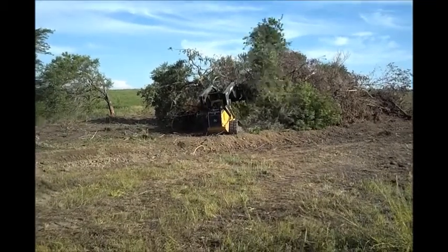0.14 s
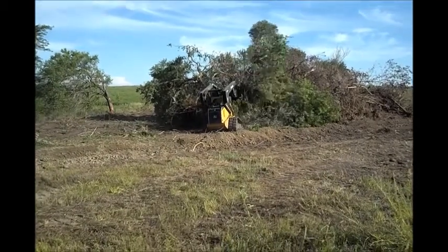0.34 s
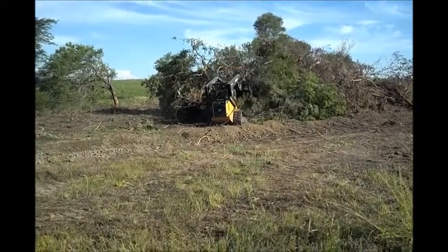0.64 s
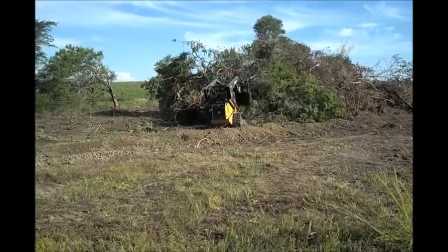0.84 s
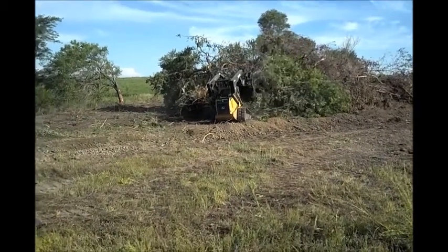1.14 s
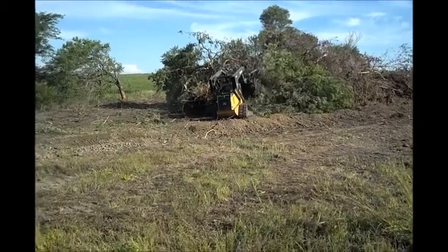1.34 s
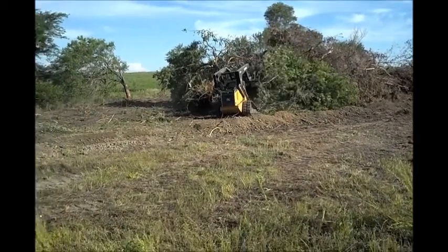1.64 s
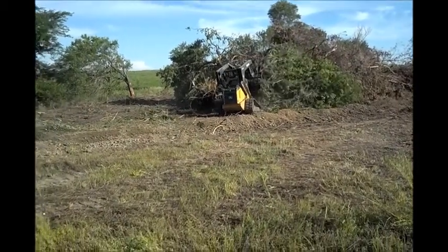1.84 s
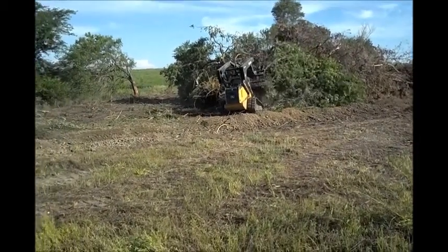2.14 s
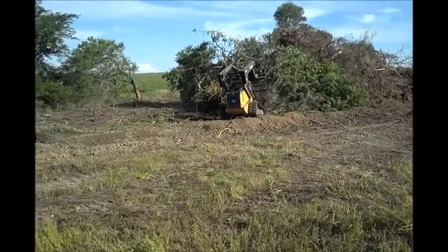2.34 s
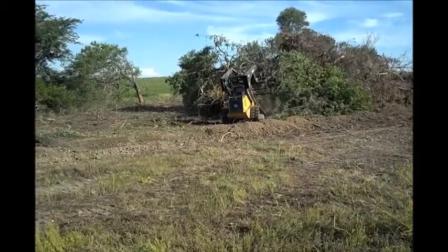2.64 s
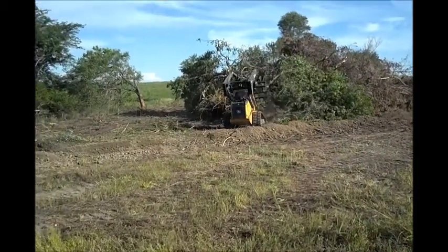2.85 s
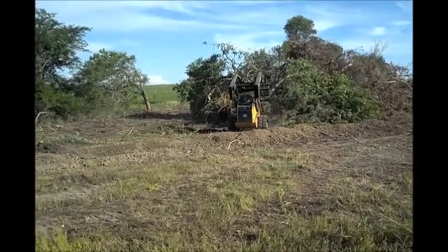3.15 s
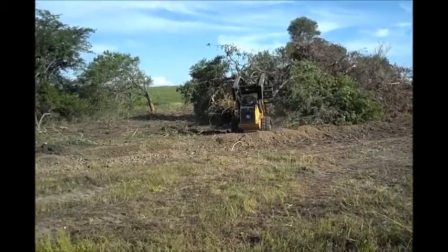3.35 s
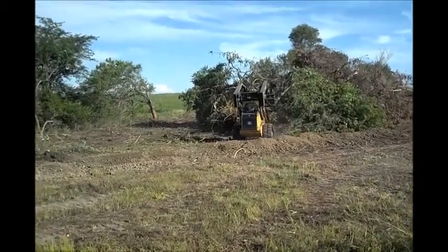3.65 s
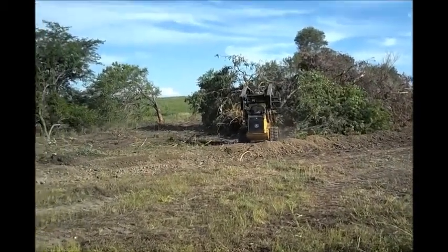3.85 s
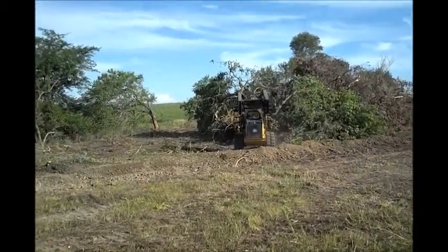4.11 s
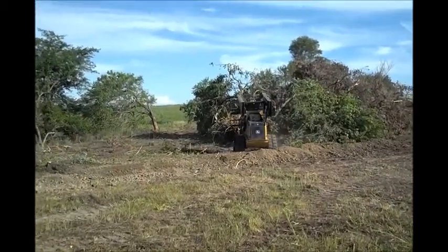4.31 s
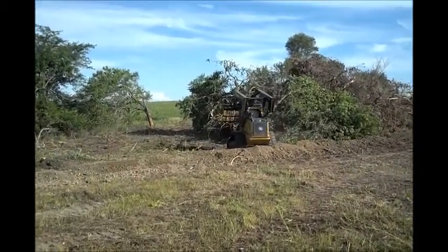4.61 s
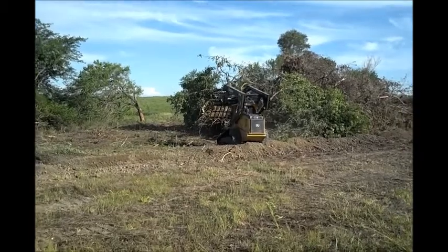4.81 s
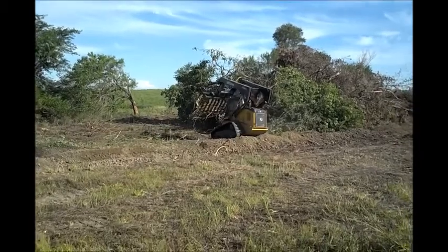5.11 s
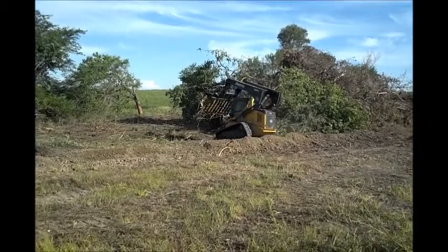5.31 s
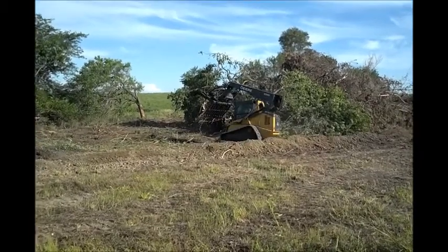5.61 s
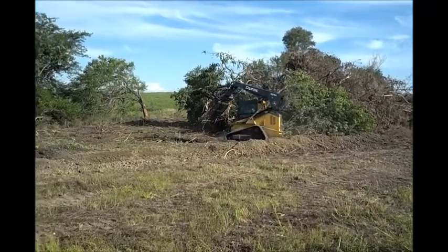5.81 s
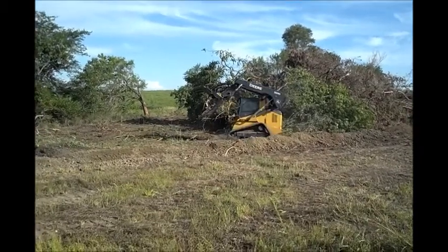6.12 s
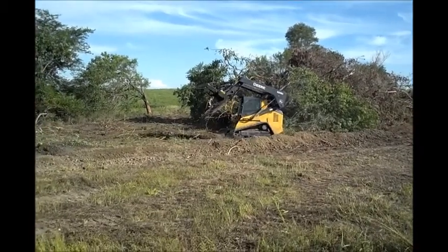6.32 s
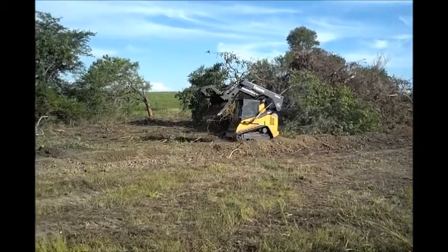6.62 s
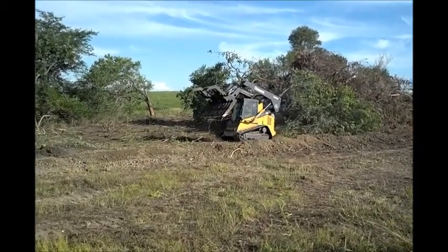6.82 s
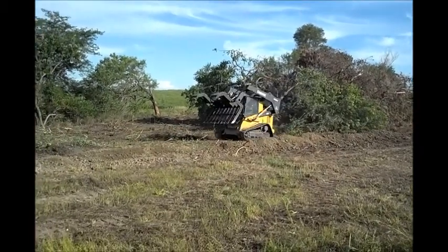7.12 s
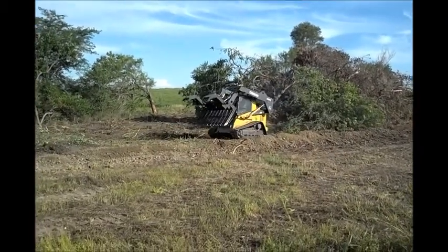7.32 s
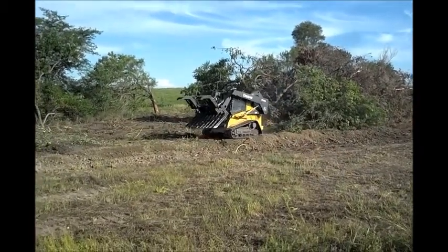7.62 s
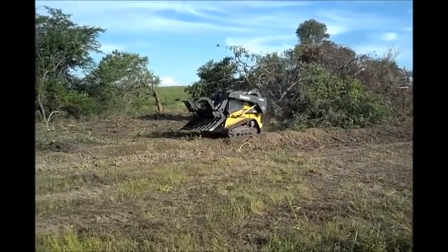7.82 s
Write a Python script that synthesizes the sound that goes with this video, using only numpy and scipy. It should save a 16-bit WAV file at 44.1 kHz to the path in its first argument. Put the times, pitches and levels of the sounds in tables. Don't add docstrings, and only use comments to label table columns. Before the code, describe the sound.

A distant tracked diesel loader works in an open field, heard through a close microphone battered by wind. The first half second has strong buffeting and a heavy low pop at 0.5 while engine and pump rise in pitch. A bright crunch at 1.6 precedes a burst of wind slaps from 1.7 to 2.0 and a short clank. The engine sags toward 3.0; more slaps from 3.2 to 3.6 dip its level, with a hard dull clang at 3.3. The roar is fullest around 3.8, clattering and whining. Pops return at 5.1 to 5.5, a loud clank at 5.8, then the strongest slaps at 6.0 to 6.3, ducking the engine. It recovers softer and duller, revving higher from 7 as the hydraulic whine fades. A clank at 7.3, a very faint high turbo whistle, and quick knocks at 7.7 and 7.8 lead to a hard final clank at 7.9, amid wind flutters.

```python
import sys
import numpy as np
from scipy import signal
from scipy.fft import rfft, irfft, next_fast_len
from scipy.io import wavfile

SR = 44100
rng = np.random.default_rng(int(sys.argv[2]) if len(sys.argv) > 2 else 0)


def master_out(mix):
    frames = np.transpose(np.atleast_2d(mix))
    ceiling = np.clip(frames, -1, 1)
    pcm = np.round(ceiling * 32767).astype(np.int16)
    wavfile.write(sys.argv[1], SR, pcm)


def volts_from_decibels(level):
    exponent = np.asarray(level, float) / 20
    return 10 ** exponent


N = 351024
MATRIX_LAG_SAMPLES = 16

# t/s, level/dB
WIND = [(0, -16), (1.1, -28.5), (1.7, -24), (2.5, -37), (3.2, -33), (3.8, -25.5), (4.8, -32), (5.6, -32),
        (6.4, -23.5), (7.2, -22), (7.96, -32)]
# t/s, peak/dB, centre f/Hz, sign
GUSTS = [(0.004, -15.5, 240, -1), (0.132, -18, 220, -1), (0.21, -21.5, 224, -1), (0.346, -21, 173, -1),
         (0.372, -16.5, 186, -1), (0.438, -16.5, 165, -1), (0.533, -3, 208, 1), (1.727, -4.5, 180, -1),
         (1.78, -7.5, 233, 1), (1.817, -14, 231, -1), (1.842, -13, 162, -1), (1.869, -13.5, 290, -1),
         (1.907, -6.5, 159, 1), (1.961, -12, 162, 1), (2.549, -10.5, 126, -1), (3.19, -5.5, 141, -1),
         (3.408, -7, 165, -1), (3.509, -9, 142, 1), (3.627, -16, 151.5, -1), (5.067, -5.5, 269, 1),
         (5.257, -9, 165, -1), (5.278, -5.5, 229, 1), (5.512, -9.5, 156, -1), (6.001, -9.5, 166.5, -1),
         (6.063, -10, 171, 1), (6.121, -8.5, 234, -1), (6.141, -4, 191.4, -1), (6.278, -1.5, 186, 1),
         (6.345, -8.5, 190, -1), (7.926, -12, 147, 1)]
# t/s, peak/dB, centre f/Hz, sign
FRONTS = [(0.128, -19.5, 583, 1), (0.13, -32, 1300, 1), (0.208, -26, 595, 1), (0.37, -26.5, 500, 1),
          (1.779, -10.5, 401, -1), (1.907, -20, 480, 1), (6.279, -16.5, 382.7, 1), (6.137, -7, 325, 1),
          (6.146, -16, 400, 1)]
# t/s, peak/dB, centre f/Hz
FLUTTERS = [(0.027, -20, 255), (0.186, -21, 147), (0.553, -24, 163), (0.652, -21, 160), (1.775, -18, 190),
            (2.557, -13, 117), (2.699, -15, 142.8), (3.009, -15, 154), (4.116, -14, 237), (4.269, -17, 195),
            (5.099, -13, 220), (5.182, -15.6, 167), (5.437, -13, 243), (5.497, -12.5, 296),
            (5.546, -13, 260), (5.587, -12, 207), (6.38, -18, 185), (6.906, -15, 139), (7.091, -18, 135),
            (7.159, -16.5, 176), (7.433, -12, 142), (7.571, -17, 127.9)]
# t/s, peak/dB, centre f/Hz, sign
BACK_GUSTS = [(1.413, -24, 256, -1), (5.249, -12, 180, -1), (7.6, -11.5, 217, 1), (7.632, -13, 174, 1),
              (7.859, -12, 141, 1), (7.944, -11, 174, 1)]
# t/s, drop/dB
DUCKS = [(.13, 2.5), (.37, 2), (.535, 2.5), (1.73, 2), (1.78, 2), (1.91, 2), (2.555, 2), (3.193, 7.5),
         (3.41, 3), (3.51, 3.5), (5.28, 4), (5.55, 2.5), (6.001, 6), (6.065, 2.5), (6.143, 4), (6.28, 8.5)]
# f/Hz, phase past matrix delay/rad, right minus left/dB, likeness/0-1
PORTS = [(90, 3.5, -10.5, 0.93), (325, 2.5, -3.5, .9), (450, 3.5, -5.5, 0.7), (550, 1.3, 3, 0.8),
         (595, 0.3, -1.5, 0.7), (722, -0.64, 1.5, 1), (937, -1.3, -1, 0.98), (1566, 1, 2.5, 0.99),
         (1840, 1.63, -2, 0.99), (2010, 0.3, -1.5, 1), (2220, 0.4, 3.5, 0.7), (2420, 0.58, 3, 0.84),
         (2620, 0.7, 1, 0.25), (3050, 0, 2.5, .97), (3700, 0, .5, .95), (4300, 0.05, -2, 0.69),
         (15500, 0, 1, 0.83)]
# t/s, left notch f/Hz, share/0-1, right notch f/Hz, share/0-1
HOUSING_ECHOES = [(0, 2100, .5, 3200, .3), (2.0, 2120, .55, 3220, .35), (3.3, 2180, .55, 3280, .7),
                  (4.2, 2270, .5, 3600, .7), (4.45, 2260, .35, 3000, .5), (6.4, 2170, .4, 2950, .45),
                  (7.96, 2250, .35, 3000, .3)]
# t/s, peak/dB, brightness/(dB/octave), chatter/s, crunch over ring/dB
CLANKS = [
    (1.588, -24.5, 21, 0.019, 18),
    (2.012, -23.5, 3, 0.011, 1),
    (3.327, -12, -5, 0.007, -11),
    (5.776, -15, 6, 0.011, 5),
    (7.255, -19, 14, 0.011, 5.5),
    (7.526, -36, -3.5, 0.008, 12),
    (7.705, -21, -5, 0.0069, 2),
    (7.779, -20, 3, 0.0068, 1.5),
    (7.858, -12.5, 6, 0.0085, -2),
]
# f/Hz, level/dB, t60/s
STEEL_MODES = [(946, -3, 0.045), (1007.8, 2, 0.045), (1137.3, -2, 0.05), (1520.7, -10, 0.025),
               (1775, -9, 0.03), (2080, -17, 0.06), (2430, -14, .025)]
# t/s, roar at full gain/dB, brightness/dB (falls as the flank turns)
LOAD = [(0, -36.5, -1), (.45, -31.5, 1.5), (1.62, -29, 1.5), (1.85, -28.5, 0), (2.5, -30.5, -2),
        (3.15, -29, 1), (3.55, -27.5, 2.5), (3.85, -24, 2.5), (4.15, -28, 1.5), (4.36, -27.5, 2.5),
        (4.58, -29, -1), (4.9, -27.5, 0), (5.5, -29, -2.5), (5.72, -29, 1.5), (5.98, -30, -1),
        (6.35, -31.5, -5), (6.9, -35, -4), (7.96, -30.5, -6)]
# f/Hz, density/(dB per Hz)
BLOCK = [(50, -17.5), (90, -10), (300, 1), (560, -8), (700, 0), (950, 3), (1450, -6), (1850, 0), (2800, -9),
         (3400, -12.5), (4200, -14), (5200, -17), (10300, -28), (15800, -32)]
# f/Hz, width/Hz, level/dB
PANELS = [(2465, 230, 3), (3440, 55, 6.5), (4750, 43, 4), (7540, 320, 3.5), (11030, 790, -9.5)]
# t/s, piston rate f/Hz, whine over roar/dB, overtone over roar/dB
PUMP = [(0, 268, 2, -27), (.3, 279, -5.5, 1), (.6, 300.3, 0, -14), (1.0, 315, -1.5, -12),
        (1.8, 323.3, -4, -17.5), (3.1, 322.2, 0.5, -11.5), (3.5, 323.8, 3, -46), (4.3, 326.7, -1.5, -11.5),
        (4.8, 325.4, 0, -6), (5.2, 324.2, -7, -15), (6.3, 324.6, -6, -13), (7.0, 332.5, -25, -9),
        (7.96, 332.5, -33, -16)]
# t/s, firing rate f/Hz, exhaust boom over roar/dB, strain/dB
CRANK = [(.3, 72, 0.5, -18), (.8, 87.6, -1, -13), (1.2, 91.6, 0, -11), (1.65, 88.2, -3, -7),
         (2.2, 83.9, -5, -9), (3.05, 79.8, -5.5, -10.5), (3.33, 88.8, -4, -9), (3.6, 86, -5, -5),
         (4.17, 91.9, 0, -9.5), (4.72, 86, -7, -28), (5.45, 85, -10.5, -38), (5.68, 79.1, -2.5, -5.5),
         (5.85, 77.3, -1, -8.5), (6.2, 81, 3.5, -29), (6.53, 80.9, 4.5, -19), (7.08, 98.3, 5, -18),
         (7.5, 95.8, 5.5, -9.5), (7.96, 100, -2.5, -21)]
# multiple of firing rate, level over roar plus strain/dB
UPPER_ORDERS = [(2.5, -6), (3, -3), (3.5, -3.5), (4, -2), (5, -10)]


def in_time(rows):
    s, *columns = np.transpose(rows)
    return [np.interp(np.arange(N) / SR, s, c) for c in columns]


def at_hz(points, hz):
    known_hz, *columns = np.transpose(points)
    return [np.interp(np.log(hz + 1), np.log(known_hz), c) for c in columns]


def rms_one(x):
    return x / np.sqrt(np.mean(x ** 2) + 1e-20)


def drift(rate_hz):
    step = 40
    r = np.exp(-2 * step * np.pi * rate_hz / SR)
    white = rng.standard_normal(N // step + 2002)
    slow = signal.lfilter([1], [1, -2 * r, r * r], white)[2000:]
    return np.interp(np.arange(N) / step, np.arange(len(slow)), rms_one(slow - slow.mean()))


def band(x, low_hz, high_hz):
    return signal.sosfilt(signal.butter(2, [low_hz, high_hz], "band", fs=SR, output="sos"), x)


def tone(turns, rms_db, wobble_db):
    level = np.sqrt(2) * volts_from_decibels(rms_db + wobble_db * drift(6.9))
    return level * np.sin(2 * np.pi * (turns + rng.random()))


def gain_db():
    start_drop_db, recover_db_per_s, duck_s = 18, 10.5, 0.011
    t = np.arange(N) / SR
    ducked_db = sum(db * np.clip((t - s) / duck_s, 0, 1) for s, db in DUCKS)
    owed_db = ducked_db - recover_db_per_s * t
    return np.minimum(np.minimum.accumulate(owed_db), -start_drop_db) - owed_db


def work():
    roar_db, bright_db = in_time(LOAD)
    return roar_db + gain_db(), bright_db


def buffeting():
    lumps = volts_from_decibels(8.0 * np.array([drift(42), drift(30)]) + [[-2], [1]])
    low_noise = band(rng.standard_normal((2, N)) * lumps, 51, 186)
    cut = signal.sosfilt(signal.butter(3, 75, "high", fs=SR, output="sos"), low_noise)
    left, right = signal.sosfilt(signal.butter(2, 380, fs=SR, output="sos"), cut)
    both = np.array([left - np.roll(right, MATRIX_LAG_SAMPLES), right - np.roll(left, MATRIX_LAG_SAMPLES)])
    rumble = volts_from_decibels(-35.5) * rms_one(band(rng.standard_normal(N), 13, 45))
    return volts_from_decibels(in_time(WIND)[0] + gain_db()) * (rms_one(both) + rumble)


def gusts():
    right_share, left_share = 0.95, 0.054
    rise_cycles, fall_cycles, crest_cycles = 0.42, 0.93, 0.083
    before, after = 500, 1500
    t = np.arange(-before, after) / SR
    out = np.zeros((2, N + 2000))
    flutters = [(*row, -1) for row in FLUTTERS]
    slaps = [(*row, right_share) for row in GUSTS + FRONTS + flutters]
    slaps += [(*row, left_share) for row in BACK_GUSTS]
    for s, peak_db, hz, sign, share in slaps:
        lead_s = (share - .5) * MATRIX_LAG_SAMPLES / SR
        cycles = (t + np.array([[-lead_s], [lead_s]])) * hz
        rise = np.exp(-(cycles / rise_cycles) ** 2)
        fall = np.exp(-(np.hypot(cycles, crest_cycles) - crest_cycles) / fall_cycles)
        body = np.where(cycles < 0, rise, fall)
        turns = 1.11 * cycles / (1 + 0.42 * np.maximum(cycles, 0))
        slap = np.sign(sign) * volts_from_decibels(peak_db) * body * np.cos(2 * np.pi * turns) * [[1], [-1]]
        start = round(s * SR) - before
        out[:, max(start, 0):start + len(t)] += slap[:, max(-start, 0):]
    return out[:, :N]


def turbo():
    start_s, start_hz, climb_hz_per_s = 7.29, 14350, 850
    start_db, fade_db_per_s, attack_s = -63.5, 7, 0.03
    since_s = np.arange(N) / SR - start_s
    hz = start_hz + climb_hz_per_s * since_s + 160 * drift(200)
    level_db = start_db - fade_db_per_s * np.maximum(since_s, 0)
    swell = np.clip(since_s / attack_s, 0, 1)
    return swell * tone(np.cumsum(hz) / SR, level_db, wobble_db=3.5)


def clanks():
    t = np.arange(2500) / SR
    ring, crunch = np.zeros(N), np.full(N, 1e-18)
    for s, peak_db, bright_db, chatter_s, crunch_db in CLANKS:
        envelope = np.exp(-t / (2 * chatter_s)) * (1 - np.exp(-3 * t / chatter_s))
        burst = rng.standard_normal(len(t)) * envelope
        crunch[round(s * SR):][:len(t)] += burst * volts_from_decibels(peak_db + crunch_db - 6.5)
    for hz, level_db, t60_s in STEEL_MODES:
        blows = np.full(N, 1e-18)
        for s, peak_db, bright_db, chatter_s, crunch_db in CLANKS:
            envelope = np.minimum(t / 0.0016, 1) * np.exp(-t / chatter_s)
            blow = 0.15 * envelope * rng.standard_normal(len(t))
            blow[0] = 0.98 * rng.choice([-1, 1])
            blow_db = peak_db + level_db - 11.0 + bright_db * np.log2(hz / 1000)
            blows[round(s * SR):][:len(t)] += blow * volts_from_decibels(blow_db)
        r, w = volts_from_decibels(-60 / (t60_s * SR)), 2 * np.pi * hz / SR
        ring += signal.lfilter([0, np.sin(w)], [1, -2 * r * np.cos(w), r * r], blows)
    bright_crunch = volts_from_decibels(-8.5) * band(band(crunch, 2200, 4600), 1330, 13000)
    return ring + band(crunch, 830, 2540) + bright_crunch


def clatter():
    clatter_db, bright_db = work()
    knock_db = -1.5 + 0.86 * bright_db
    hiss_db = -11 + bright_db - 0.05 * gain_db()
    turns = np.cumsum(in_time(CRANK)[0]) / SR
    knock = volts_from_decibels(2.6 * np.exp(-(turns % 1) / 0.3) + .5 * np.cos(np.pi * turns))
    tick_level = volts_from_decibels(9 + 1.8 * np.minimum(rng.exponential(1, N), 4))
    ticks = (rng.random((2, 2, N)) < 250 / SR) * tick_level
    white = rng.standard_normal((2, 2, N)) * knock * (1 + ticks)

    edges_hz = 44 * 2 ** np.arange(0, 8.6, .5)
    together = drift(9) + .6 * drift(30)
    out = np.zeros((2, N))
    for k, (low_hz, high_hz) in enumerate(zip(edges_hz, edges_hz[1:])):
        if high_hz < 1500:
            part_db = 0
        elif high_hz < 3000:
            part_db = knock_db + 2.5
        else:
            part_db = hiss_db + 10.5
        waver_db = 0.33 * together + 0.54 * drift(7) + 1.03 * drift(0.83)
        out += volts_from_decibels(part_db + waver_db) * band(white[k % 2], low_hz, high_hz)

    size = next_fast_len(N)
    hz = np.fft.rfftfreq(size, 1 / SR)
    panels_db = sum(db / (1 + ((hz - centre_hz) / width_hz) ** 2) for centre_hz, width_hz, db in PANELS)
    out = irfft(rfft(out, size) * volts_from_decibels(at_hz(BLOCK, hz)[0] + panels_db), size)[:, :N]
    preamp_hiss = volts_from_decibels(-76) * band(rng.standard_normal((2, N)), 8400, 17000)
    return volts_from_decibels(clatter_db) * out / band(out[0], 727, 1367).std() + preamp_hiss


def fan():
    return tone(358 * np.arange(N) / SR, work()[0] - 15.5, wobble_db=1.0)


def pump():
    roar_db = work()[0]
    hz, whine_db, overtone_db = in_time(PUMP)
    turns = np.cumsum(hz) / SR
    out = tone(turns, roar_db + whine_db, wobble_db=.7)
    out += tone(2 * turns, roar_db + overtone_db, wobble_db=2.8)
    return out + tone(3 * turns, roar_db + overtone_db - 13.5, wobble_db=6.5)


def exhaust():
    roar_db = work()[0]
    hz, boom_db, strain_db = in_time(CRANK)
    turns = np.cumsum(hz) / SR
    first_db = roar_db - 6.5 + 0.28 * (hz - 86) + 0.32 * boom_db
    out = tone(turns, first_db, wobble_db=1.1)
    out += tone(2 * turns, roar_db + boom_db, wobble_db=1.0)
    for multiple, level_db in UPPER_ORDERS:
        out += tone(multiple * turns, roar_db + strain_db + level_db, wobble_db=2.5)
    return out


def housing(direct):
    left_hz, left_share, right_hz, right_share = in_time(HOUSING_ECHOES)
    treble = signal.sosfiltfilt(signal.butter(2, [1750, 6200], "band", fs=SR, output="sos"), direct)
    n = np.arange(N)
    left_echo = np.interp(n - SR / left_hz, n, treble)
    right_echo = np.interp(n - SR / right_hz / 2, n, treble)
    return np.array([direct - left_share * left_echo, direct + right_share * right_echo])


def ports(direct, unrelated):
    size = next_fast_len(N + 2048)
    hz = np.fft.rfftfreq(size, 1 / SR)
    phase, right_db, alike = at_hz(PORTS, hz)
    alike = np.clip(alike, 0, 1)
    delay = 2 * np.pi * hz * MATRIX_LAG_SAMPLES / SR
    left, right = rfft(housing(direct), size)
    right = alike * right + np.sqrt(1 - alike ** 2) * rfft(unrelated, size)
    right = -right * np.exp(1j * (phase - delay)) * volts_from_decibels(np.minimum(right_db, 0))
    left = left * volts_from_decibels(-np.maximum(right_db, 0))
    mid_gain = np.minimum(2.4 * np.abs(np.sin(delay / 2)), 1)
    side_gain = np.minimum(1.9 * np.abs(np.cos(delay / 2)), 1)
    mid = (left + right) / 2 * np.where(hz > 1500, mid_gain, 1)
    side = (left - right) / 2 * np.where(hz > 3000, side_gain, 1)
    return irfft(np.array([mid + side, mid - side]), size)[:, :N]


def scene():
    noise, unrelated = clatter()
    hum = volts_from_decibels(1.5) * (exhaust() + pump() + fan())
    loader = hum + noise + clanks() + turbo()
    slaps = signal.sosfiltfilt(signal.butter(2, 60, "high", fs=SR, output="sos"), gusts())
    return ports(loader, unrelated) + slaps + buffeting()


def top_cut(x):
    return signal.sosfilt(signal.butter(12, 17040, fs=SR, output="sos"), x)


def record(dry):
    mix = signal.sosfilt(signal.ellip(10, .3, 70, 15760, fs=SR, output="sos"), dry)
    return top_cut(mix)


dry = scene()
out = record(dry)
master_out(out)
```